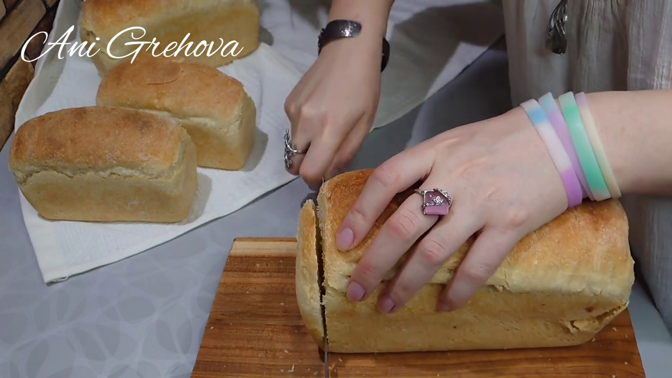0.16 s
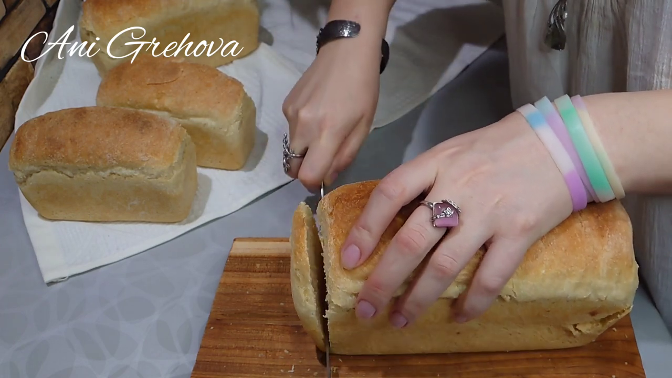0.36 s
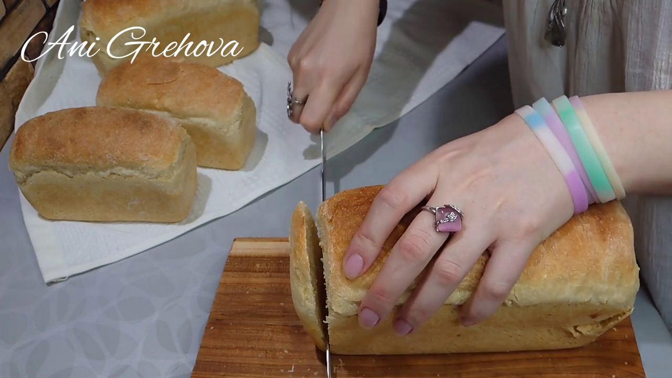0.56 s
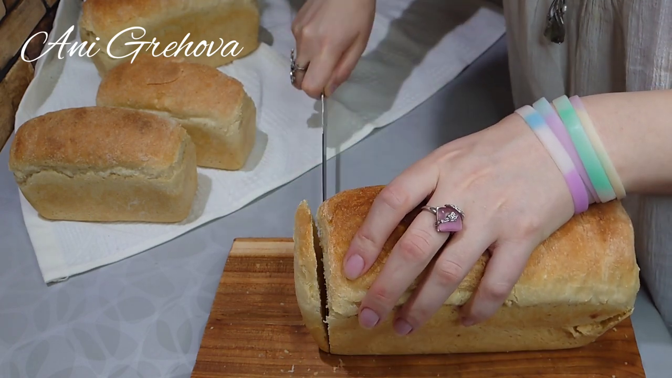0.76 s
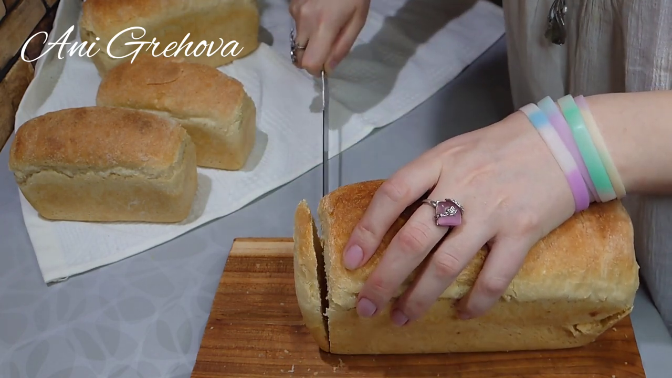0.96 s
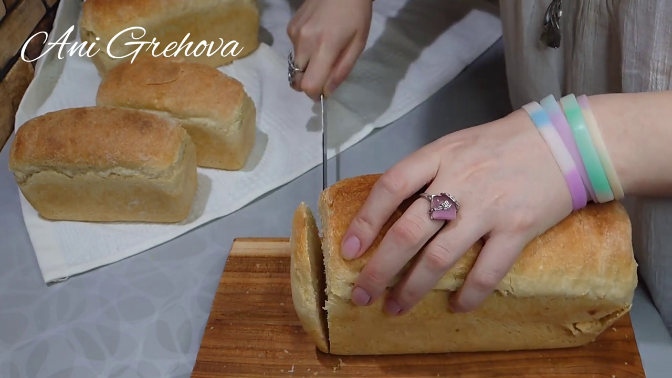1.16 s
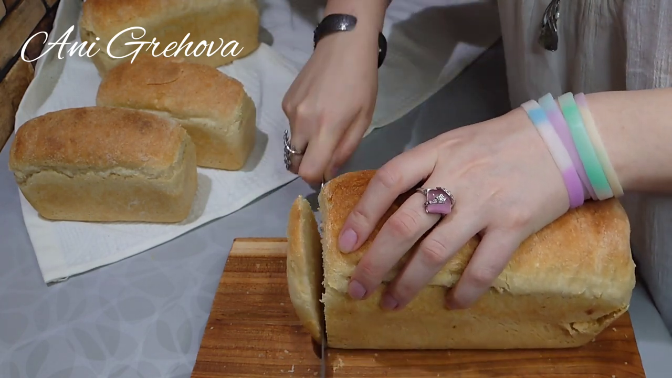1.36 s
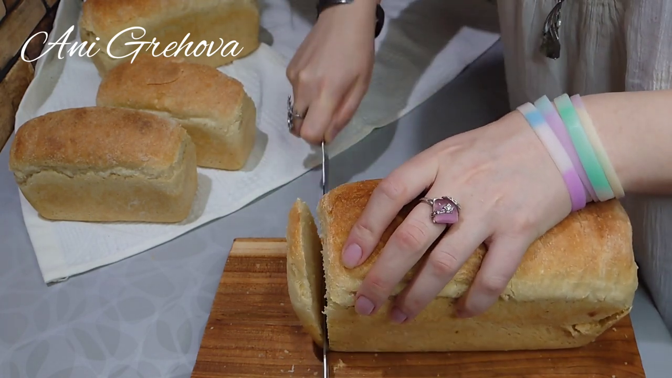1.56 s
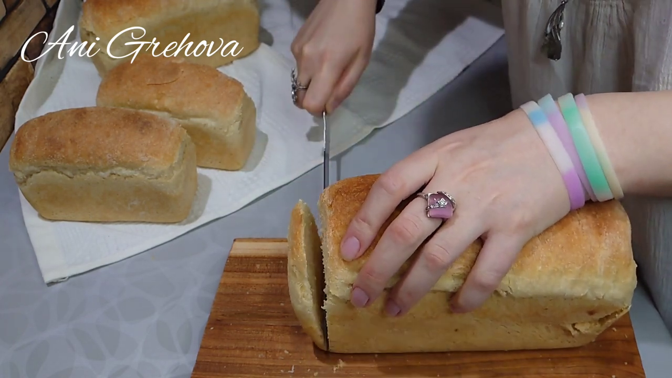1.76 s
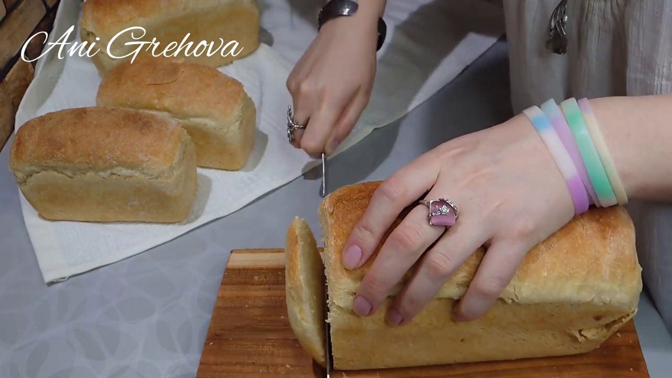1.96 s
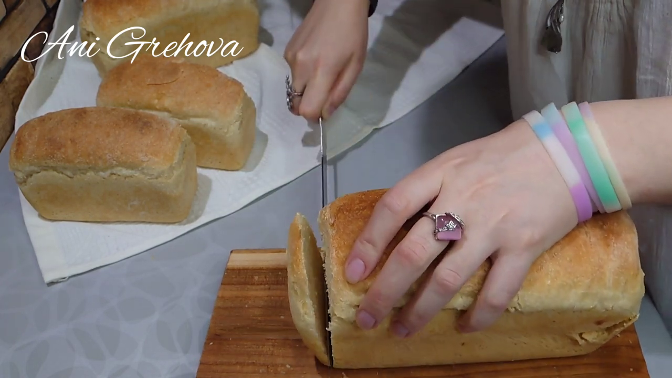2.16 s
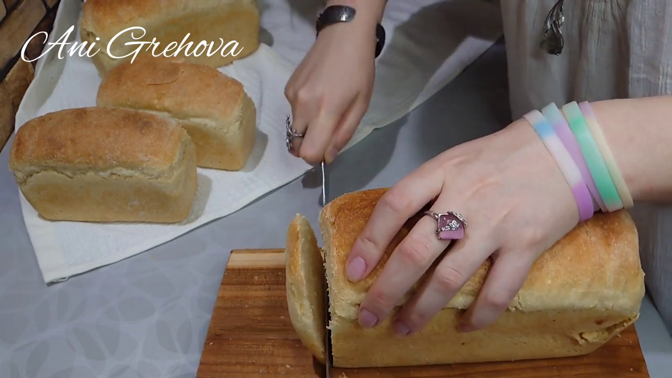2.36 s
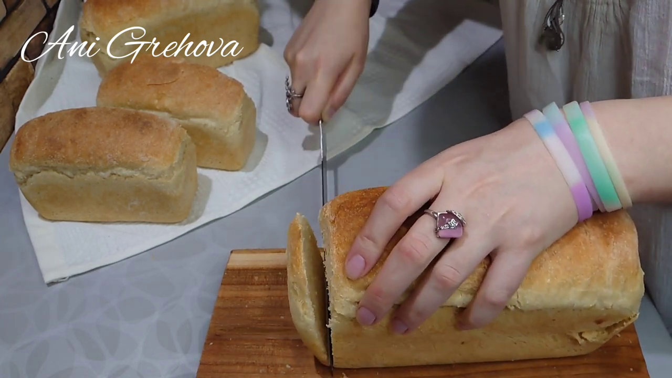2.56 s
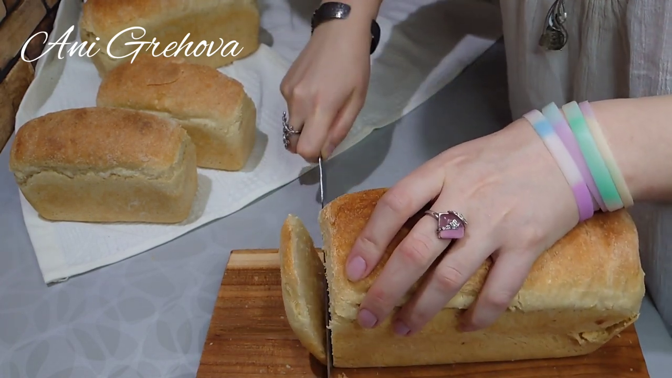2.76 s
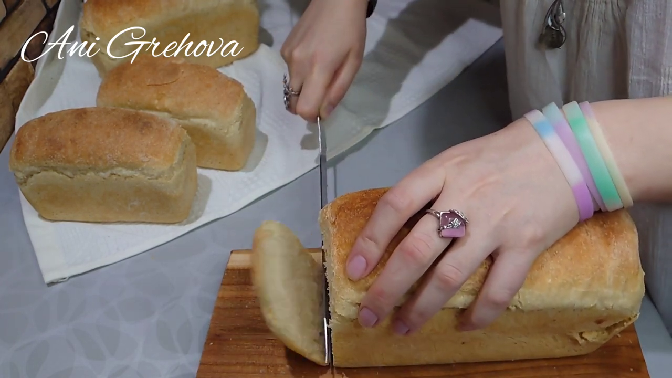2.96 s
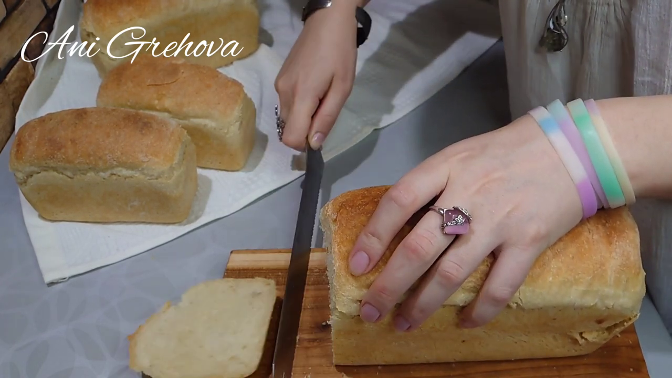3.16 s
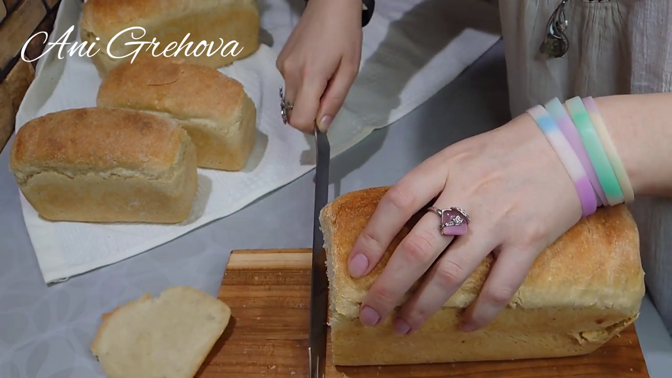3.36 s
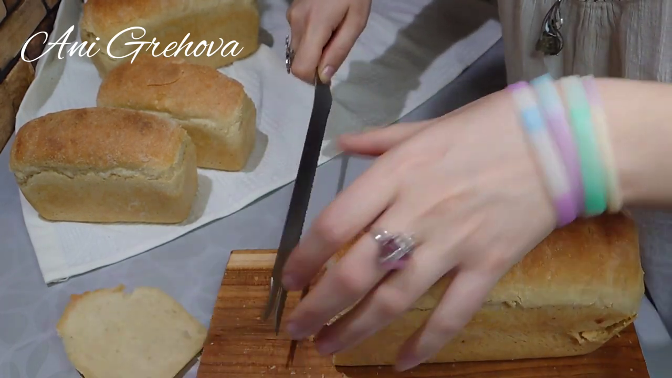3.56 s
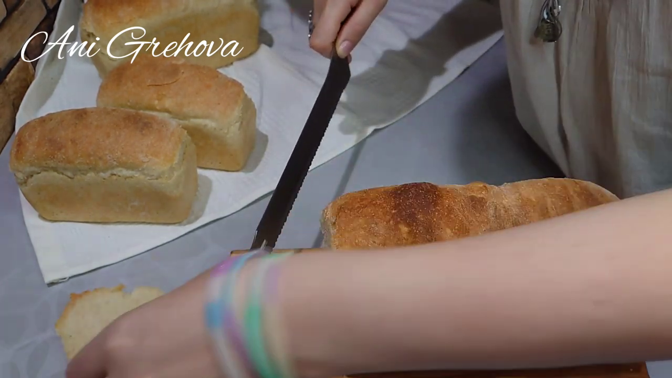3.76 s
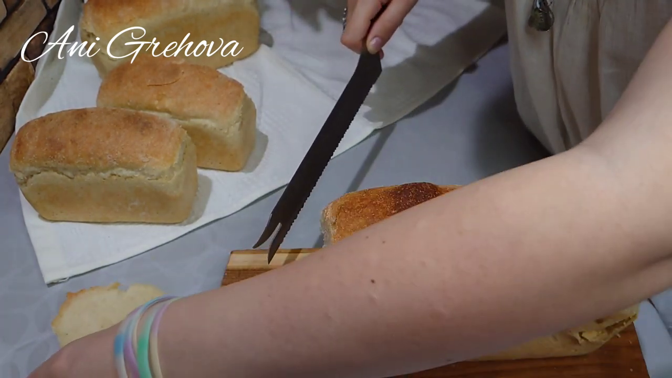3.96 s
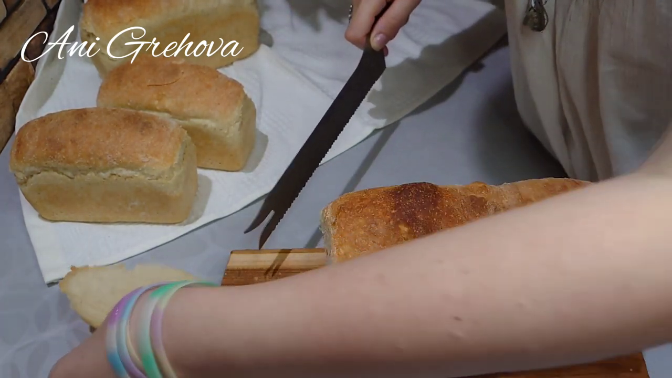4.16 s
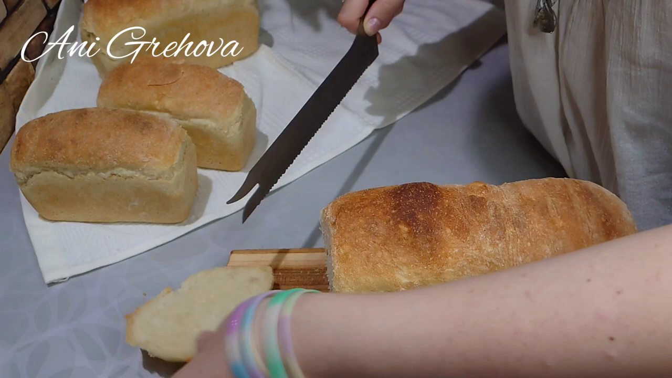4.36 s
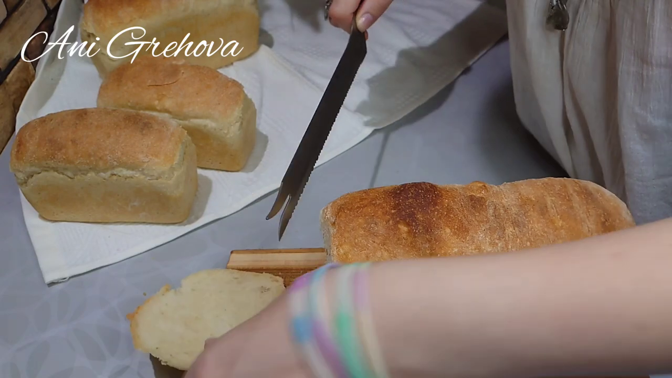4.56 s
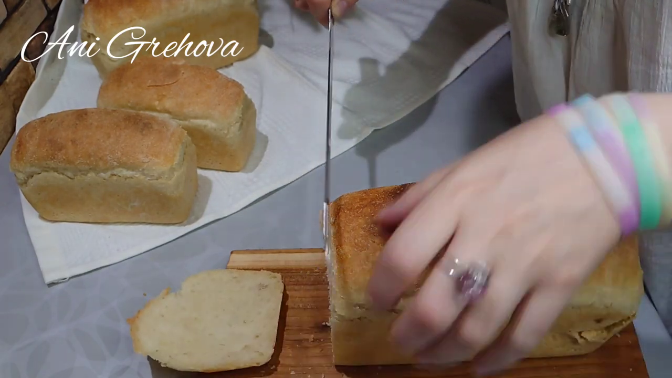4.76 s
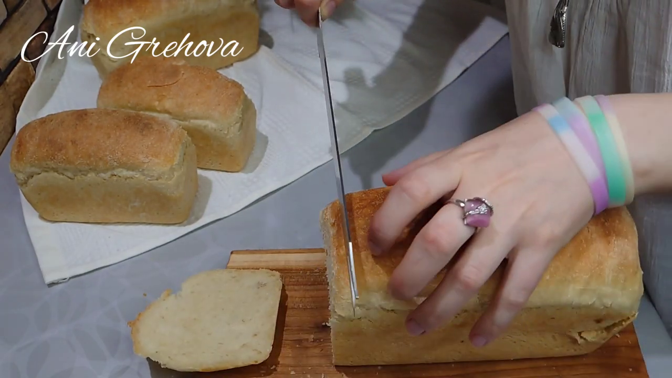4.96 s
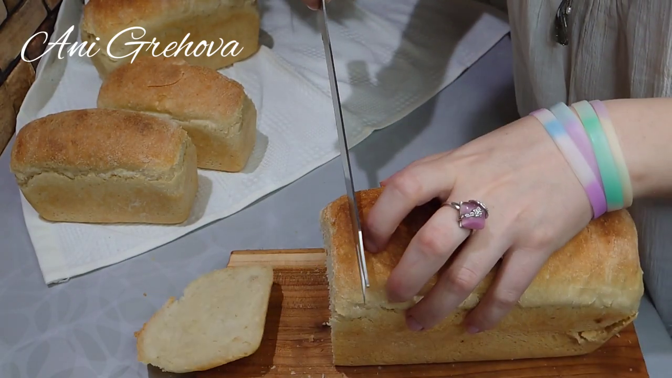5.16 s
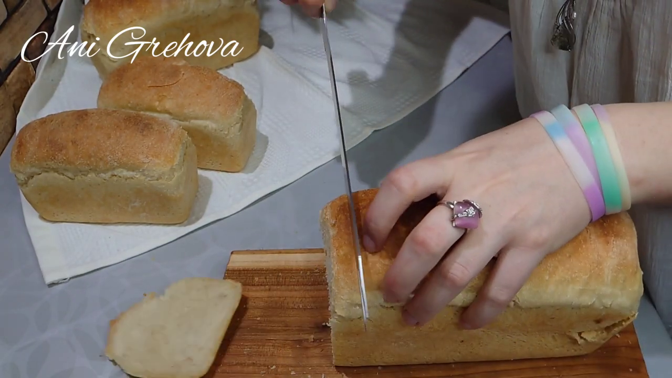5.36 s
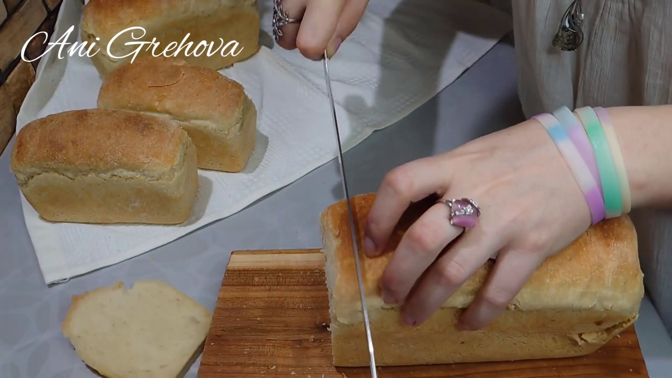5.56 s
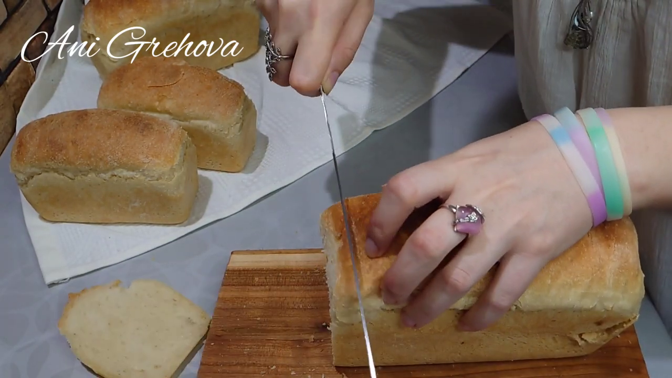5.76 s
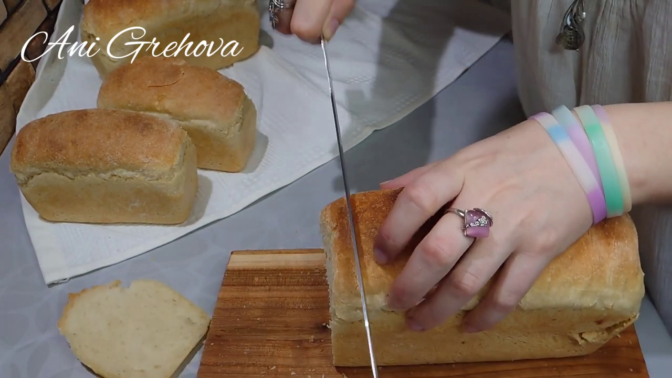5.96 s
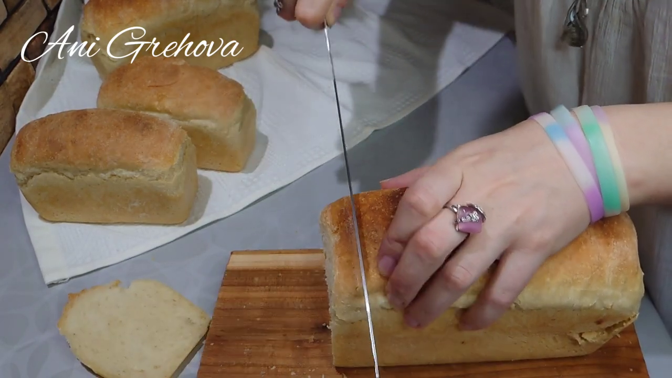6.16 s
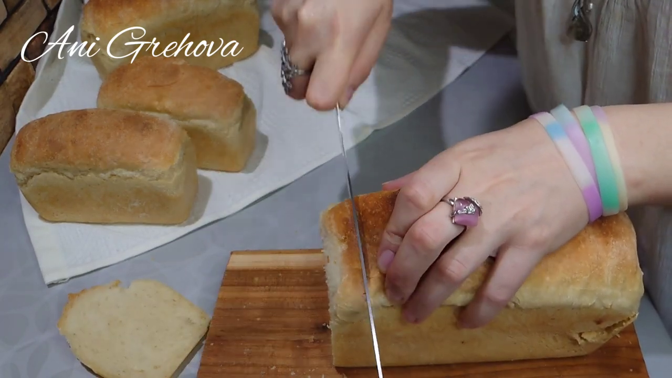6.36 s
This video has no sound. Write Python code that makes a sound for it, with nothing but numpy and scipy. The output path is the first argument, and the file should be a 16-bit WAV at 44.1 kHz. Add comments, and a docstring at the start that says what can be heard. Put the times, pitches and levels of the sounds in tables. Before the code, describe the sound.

Close in a small quiet kitchen, a serrated knife saws a crusty loaf on a wooden board. Slow hollow rasps with dry crackle come first, then a heavy double knock and faster, deeper strokes with blade ring. Another knock and small ticks end the cut; faint brushing follows, then lighter scratchy strokes on the crust. The left microphone on the table is boomy, the right airy and crisp.

```python
"""Sawing a crusty loaf

A serrated knife saws a loaf on a wooden board, taps the board, rests while a hand moves the slice,
then starts on the top crust again. Random tooth catches and single blows drive resonant wood; breaking
crumbs are noise bursts and short tones coloured by the blade, which also rings as its edge slides.
The left microphone lies on the table, heavy with bass; the right hears the crust crackle through the air.
Shaped noise and faint tones make the kitchen, and decaying noise makes its reverberation."""
import sys
import numpy as np
from scipy import signal
from scipy.fft import rfft, irfft, next_fast_len
from scipy.io import wavfile
from scipy.ndimage import map_coordinates

SR = 44100
rng = np.random.default_rng(int(sys.argv[2]) if len(sys.argv) > 2 else 0)


def unload_audio(sound):
    """Save the sound as a 16-bit wav file, at the path given as the first command line argument."""
    columns = np.transpose(np.atleast_2d(sound))
    # keep every value between -1 and 1, then stretch to whole-number steps
    steps = np.round(np.clip(columns, -1, 1) * 32767)
    wavfile.write(sys.argv[1], SR, steps.astype(np.int16))


N = 282681

# Steady kitchen hum and hiss, relative levels: pitch_hz, left_db, right_db
KITCHEN_SPECTRUM = [(24.9, 13, -11.5), (45.2, 16, -6), (102, -10.5, -15.5), (199.4, -21.5, -9),
                    (358.2, -8.5, -21), (780, -14.5, -21), (1015, -1.5, -24.5), (1258, -19.5, -26.5),
                    (1560, -14.5, -29.5), (2920, -24.5, -32.5), (4780, -43.5, -35), (5470, -56, -64.5),
                    (9200, -57, -51.5), (12300, -44, -50.5), (13300, -32, -52), (15240, -28, -50.5)]
# Left-right correlation of the hum: pitch_hz, likeness (0 to 1)
HUM_LIKENESS = [(40, 0.79), (220, 0.97), (350, 0.98), (1000, 0.18), (4000, 0.051)]
# Faint steady tones on the left: pitch_hz, level_db, start_s, end_s
STEADY_TONES = [(872, -65.5, 0, 4.3), (1744, -75, 0, 6.5), (996, -69, 0, 4.3), (781, -68, 3.68, 3.98)]
# Reverberation: pitch_hz, t60_s
WALL_DECAY = [(200, 0.3), (2000, 0.32), (10000, 0.34)]
# Table top mode: pitch_hz, width_hz, left_db, right_db
TABLE_MODES = [(113.9, 35.6, 9, 4)]
# Board rocking on the table, the first mode being its sway: pitch_hz, width_hz, left_db, right_db
ROCKING_MODES = [(53.7, 37, 1.5, -30), (165.9, 44.6, 6, -11.5), (203, 60.4, 5.7, -14)]
# Board bending, the first two modes being the low ones: pitch_hz, width_hz, left_db, right_db
BENDING_MODES = [(250.3, 46.4, -4, -26.5), (322.7, 62, 0, -44.5), (361, 59, -8, -36),
                 (434, 72, -10.5, -25.5), (545.7, 78, -10, -27), (644.3, 59, -16, -29.5),
                 (691, 17, -23.5, -27), (878, 54, -23, -28), (1005, 99, -33, -33.5),
                 (1163, 60, -28.5, -40.5)]
# Damped blade modes: pitch_hz, width_hz, lift_db
BLADE_MODES = [(1108, 24, 4), (2223, 51, -7), (2650, 66, -6), (3115, 100, -3), (4090, 180, -7.5)]
# Crackle colour at each microphone: pitch_hz, left_db, right_db
CRUST_SPECTRUM = [(300.6, -7, -8.5), (700, 0.5, -7), (1017, -6, -21), (1458, -32, -8.5), (2000, -16, -8.5),
                  (2800, -20.5, -9.5), (4180, -31, -12), (4920, -35, -15), (5780, -76, -36.5),
                  (7700, -63.5, -29), (8800, -53.5, -31), (10100, -50, -25), (13170, -28.5, -30.5),
                  (15940, -24, -27.5)]
# Blows on the board, relative levels: start_s, level_db, high_modes_over_it_db, rocking_over_it_db
KNOCK_EVENTS = [(0.471, -44, 8, 1), (0.488, -32.5, 0, 2), (1.199, -42, -5, -17), (1.22, -40, 6, -14),
                (1.33, -21, -4, -3), (1.354, -11.5, -7.5, -19), (1.367, -27, 1, -19), (1.414, -7, 2, -11),
                (1.422, -4.5, 3.5, -35), (1.432, -3.5, -5, -19), (1.45, -24, -3, -22),
                (1.953, -24, -4, -23), (1.979, -30.5, 11.5, -16), (2.033, -16, -5, -6.5),
                (2.072, -15, -5.5, -20), (2.323, -21.5, -10, -12), (2.516, -32, 2, -3), (2.681, -27, 2, -8),
                (2.706, -21.5, 6, -10), (2.732, -17, 6, -31), (2.898, -29, 7, -20), (3.07, -28, -9, -11),
                (3.104, -37, 1, -18), (3.187, -6.5, 2.5, -15), (3.321, -26.5, 10, -21),
                (3.338, -19, 3, -19), (3.457, -32, 3.5, -27), (3.567, -38.5, 6, -27),
                (3.627, -28.5, 5.5, -18), (3.943, -34, 2, -17), (3.997, -45, -2, -17), (4.446, -38, 3, -9),
                (4.574, -52, 12, -17), (4.625, -54, 17.5, -25), (5.354, -45, 11, -23), (5.384, -38, 7, -8),
                (5.427, -38, 8, -16), (5.679, -30.5, 8.5, -30)]
# Crust cracks and blade ticks, relative levels: start_s, level_db, treble_over_it_db, t60_ms
CRACK_EVENTS = [(0.0524, -40.5, -21, 33), (0.0765, -37.5, -14.5, 60), (0.102, -39, -19, 29),
                (0.122, -33, -18, 20), (0.158, -44, -17, 29), (0.191, -58, -21, 28), (0.2478, -39, -19, 17),
                (0.284, -57, -8, 14), (0.403, -60.5, -3, 10), (0.435, -58, -5, 12),
                (0.4773, -45.5, -12, 12), (0.559, -31.5, -13.5, 69), (0.568, -37, -25, 9.8),
                (0.5943, -41.5, -2.5, 26), (1.409, -29.5, -32.5, 29), (1.432, -35.5, -24, 14),
                (1.45, -23, -25, 5.4), (1.539, -47, -10, 15), (1.668, -47, -4, 15.7), (1.72, -56, -10, 12),
                (2.0055, -48, -23, 13), (2.172, -42.5, -21, 14), (2.206, -46, -24, 16),
                (2.324, -49, -21, 20), (2.65, -43.5, -10.5, 17), (2.716, -46, -26, 14),
                (3.1881, -26.5, -23, 22), (3.26, -44.5, -21.5, 18), (3.323, -49, -5.5, 28),
                (3.339, -38.5, -22, 3), (3.456, -56.5, -0.5, 17), (3.587, -49, -28, 20),
                (3.6318, -35, -36.5, 9.6), (3.8505, -48, -26, 12), (4.449, -51.5, -25, 17),
                (4.574, -50, -24, 15), (5.35, -48.5, -6, 12), (5.3808, -59, -18, 11),
                (5.4878, -51, -2.5, 13), (5.677, -43, -12.5, 12), (5.7154, -37, -16, 47),
                (6.2342, -49, -23, 14)]
# Fingers brushing the slice, relative levels: start_s, level_db, treble_over_it_db, length_ms
BRUSH_EVENTS = [(4.1806, -61, -18.5, 11), (4.2194, -69, -17, 32), (4.57, -62, -23, 66),
                (4.8973, -60, -18.5, 28), (5.1874, -78, -15, 17)]
# Blade edge sliding with no crumb to damp it:
# full_from_s, rise_s, hold_s, fall_s, half_growth_db, low_ring_db, high_ring_db
SLIDE_EVENTS = [(3.265, .02, 0.026, .02, -4.5, -68, -74), (3.325, 0.02, .015, .06, 2, -49, -79),
                (3.45, .06, .15, .03, 4, -67, -86.5), (5.37, .03, 0.22, .03, -4, -62, -78)]
# How much a stroke rings the blade, by depth of the cut: time_s, low_ring_db, high_ring_db, middle_ring_db
STROKE_RING = [(0, -15, -14, -22), (1.2, -3, -14, -26), (2, -1.5, -11, -20), (3.15, -1, -13, -20.5),
               (5.3, -11, -36, -16), (6.41, -6, -32, -9)]
# Rubs on the bread, saw strokes and the hand moving the slice:
# full_from_s, rise_s, hold_s, fall_s, half_growth_db, low_bend_db, high_bend_db, rocking_db, sway_db,
# table_top_db, crust_db, dryness_db (treble over the crust level)
STROKE_EVENTS = [(-0.03, .03, 0.027, 0.048, 2, -37.5, -41, -43.5, -30.5, -54, -52.5, -12),
                 (0.078, 0.036, 0.21, 0.11, 2.5, -34, -38.5, -49, -40, -58, -55, -7.5),
                 (0.491, 0.067, 0.23, 0.26, -2, -35.5, -36, -37.5, -36.5, -49.5, -55.5, -9.5),
                 (0.827, .06, 0.22, 0.12, -3, -47.5, -49.5, -59.5, -64, -73, -71.5, -35),
                 (1.188, 0.047, 0.13, 0.026, 2, -38, -40, -44.5, -43, -56, -67, -13.5),
                 (1.352, 0.073, 0.046, .04, 2, -29.5, -34.5, -41, -55, -46, -55.5, -12),
                 (1.414, .02, 0.023, 0.069, 2.5, -23.5, -18, -29.5, -34, -61, -47.5, -12.5),
                 (1.588, 0.23, 0.18, 0.073, 0, -34.5, -37.5, -42, -41.5, -45.5, -59, -9.5),
                 (1.982, 0.19, 0.071, 0.046, 1, -34.5, -34.5, -44.5, -39.5, -52.5, -59.5, -13),
                 (2.164, 0.077, 0.078, 0.041, 0.5, -37.5, -37.5, -41, -47, -41.5, -59, -14),
                 (2.329, 0.057, 0.092, 0.042, 2.5, -26.5, -30.5, -41, -42, -48.5, -59, -12.5),
                 (2.506, 0.13, 0.09, .06, 2, -38, -37, -41.5, -43, -51, -59.5, -11.5),
                 (2.716, 0.092, 0.087, 0.035, -1.5, -27.5, -30.5, -44.5, -36, -48.5, -56, -13.5),
                 (2.885, 0.085, 0.11, 0.03, -0.5, -39.5, -37.5, -41, -48, -44, -58.5, -13),
                 (3.086, 0.085, 0.038, 0.065, 2, -42.5, -39, -56, -51, -52, -61, -12),
                 (3.194, 0.035, 0.1, 0.065, -0.5, -44, -42, -54.5, -46, -56, -70, -11),
                 (3.318, 0.017, 0.043, 0.096, -2, -35, -31, -49, -59, -60, -58.5, -15),
                 (3.419, 0.069, 0.073, 0.29, 1, -54.5, -48, -59.5, -67, -63, -68, -16),
                 (3.641, 0.026, 0.0086, 0.093, -4.5, -53.5, -45, -56.5, -62, -77, -70, -20),
                 (3.94, 0.035, 0.017, 0.21, 0.5, -59, -55, -64, -65, -60, -79.5, -23),
                 (4.204, 0.12, .04, 0.22, 0, -75, -65, -81, -80, -74, -72.5, -13),
                 (4.466, 0.02, 0.22, .05, -4.5, -71, -59.5, -73, -67, -71.5, -81, -20),
                 (4.993, 0.19, 0.072, 0.53, -2, -72, -68, -68, -75, -71.5, -86, -9.5),
                 (5.403, 0.12, 0.16, 0.11, 0, -55.5, -45, -57, -52.5, -67.5, -65.5, -24),
                 (5.555, 0.24, 0.11, 0.067, 2, -57, -49.5, -58, -49, -64, -54, -12),
                 (5.711, 0.026, 0.066, 0.071, 0, -62, -66, -54.5, -48, -61, -50, -9),
                 (5.967, 0.099, 0.15, 0.058, 0.5, -75, -62, -57.5, -52, -62, -55.5, -11.5),
                 (6.27, 0.059, 0.18, .05, 1, -64, -59, -58, -44.5, -61, -49, -12.5)]
# Drop from the middle of a hold to its ends, in the order of the stroke levels: drop_db
HOLD_ROUNDING = [3.7, 2.5, 3.2, 2, 2.6, 2.67, 3.7]

TREBLE_HZ, TOP_HZ = 5800, 15850  # crossover from crust body to hiss, and upper band limit
SWING_DB = 20  # level gained over a rise and lost over a fall
THUD_DB, THUD_GROWS = 13.5, 0.66  # the table's thud follows the blow only in part
BEND_DB, ROCK_DB, SWAY_DB = 41.5, 39, 36.5  # how well a blow couples into each motion
TABLE_LAG_S = 0.02  # the heavy table top answers a stroke late


def amp(db):
    """Decibels to gain."""
    return 10 ** (np.asarray(db) / 20)


def unit(x):
    """Scale to rms 1."""
    return x / np.sqrt(np.mean(x ** 2) + 1e-20)


def along(points, hz):
    """Read every column after the first on a log frequency axis."""
    f, *columns = np.transpose(points)
    return np.array([np.interp(np.log(hz + 1), np.log(f + 1), c) for c in columns])


def wobble(rate):
    """A smooth random curve with rate knots a second."""
    knots = rng.standard_normal(int(N * rate / SR) + 4)
    return map_coordinates(knots, [np.arange(N) * rate / SR])


def filtered(x, response):
    """Multiply the spectrum of x by a complex response of frequency."""
    m = 2 * next_fast_len(N // 2 + SR // 4)  # room for the ringing
    return irfft(rfft(x, m) * response(np.fft.rfftfreq(m, 1 / SR)), m)[..., :N]


def causal(gain):
    """The minimum-phase response with this gain, so no sound precedes its cause."""
    cepstrum = irfft(np.log(np.maximum(gain, 1e-6)))
    half = cepstrum.shape[-1] // 2
    cepstrum[..., 1:half] *= 2
    cepstrum[..., half + 1:] = 0
    return np.exp(rfft(cepstrum))


def mode(f, hz, width):
    """One resonance, gain 1 at its centre."""
    return 1j * f * width / (hz * hz - f * f + 1j * f * width)


def slips(rate, spread_db, smooth):
    """Random catches of the teeth, rate a second and of scattered size, on an even rub."""
    hit = rng.random(N) < rate / SR
    sizes = amp(spread_db * np.clip(rng.standard_normal(N), -2, 2))
    sizes = sizes * np.sign(rng.standard_normal(N))
    return unit(unit(hit * sizes) + smooth * rng.standard_normal(N))


def swells(rows, round_db):
    """Gain curves that rise, hold with a rounded top and fall; one for each level column."""
    t, power = np.arange(N) / SR, 0
    for s, rise, hold, fall, half_growth_db, *levels in rows:
        outside = np.maximum((s - t) / rise, (t - s - hold) / fall)
        slope_db = SWING_DB * np.maximum(outside, 0)
        place = np.clip(2 * (t - s) / hold - 1, -1, 1)  # -1 to 1 across the hold
        shape_db = half_growth_db * place - slope_db
        rounding_db = np.array(round_db)[:, None] * place ** 2
        power = power + amp(np.array(levels)[:, None] + shape_db - rounding_db) ** 2
    return np.sqrt(power)


def tones():
    """Faint sine tones, each wavering a little and fading at its ends."""
    t, total = np.arange(N) / SR, 0
    for hz, db, start, end in STEADY_TONES:
        fade_db = 60 * np.maximum(np.maximum(start - t, t - end), 0) / .4
        total = total + amp(db + 1.5 * wobble(4) - fade_db) * np.sin(2 * np.pi * hz * t)
    return total


def kitchen():
    """Steady background of shaped noise and tones, near mono in the bass, slightly unsteady."""
    def mid_side(f):
        turn = np.arccos(np.clip(along(HUM_LIKENESS, f)[0], 0, 1)) / 2
        return [np.cos(turn), np.sin(turn)]

    def colour(f):
        return amp(along(KITCHEN_SPECTRUM, f)) * f ** 2 / (f ** 2 + 30 ** 2)

    mid, side = filtered(rng.standard_normal((2, N)), mid_side)
    hum = filtered(np.array([mid + side, mid - side]), colour)
    hum = amp(-55.5 + 0.22 * wobble(4.6)) * hum / np.std(hum[0])
    hum[0] += tones()
    return hum


def walls(x):
    """The kitchen's answer: decaying noise in which each frequency dies at its own speed."""
    hz, t, z = signal.stft(rng.standard_normal((2, SR // 2)), SR, nperseg=256)
    decay = amp(-60 * t / along(WALL_DECAY, hz)[0][:, None])
    tail = signal.istft(z * decay, SR, nperseg=256)[1]
    late = np.pad(x, ((0, 0), (300, 0)))  # delay in samples before the answer
    return signal.fftconvolve(late, tail / np.linalg.norm(tail[0]), axes=1)[:, :N]


def drag(stroke):
    """The sliding edge chatters and rings three blade modes, also under each stroke."""
    t = np.arange(N) / SR
    time_s, *ring_db = np.transpose(STROKE_RING)
    sliding = [*swells(SLIDE_EVENTS, [1, 1]), np.zeros(N)]
    sawing = [stroke * amp(np.interp(t, time_s, db)) for db in ring_db]
    gains = np.hypot(sliding, sawing)
    sides_db = ([[-3], [1]], [[-16], [8]], [[-8], [6]])  # left, right
    modes = ((BLADE_MODES[0][0], 200), (BLADE_MODES[-1][0], 350), (BLADE_MODES[2][0], 200))  # pitch, width in Hz
    total = 0
    for gain, side_db, (hz, width) in zip(gains, sides_db, modes):
        chatter = slips(rate=120, spread_db=4, smooth=.4)
        ring = unit(filtered(chatter, lambda f: mode(f, hz, width) ** 2))
        total = total + gain * ring * amp(side_db)
    return total * [[-1], [1]]  # opposite polarity at the two microphones


def crumbs(rate, cycles):
    """Each breaking crumb is a short damped tone of its own pitch and size."""
    s, pitch, size = rng.random((round(rate * N / SR), 3)).T
    hz, t = 900 * 6 ** pitch[:, None], np.arange(256) / SR
    decay = amp(-24 * size[:, None] - 20 * t * hz / cycles)  # 20 dB lost in this many cycles
    fade = np.cos(np.pi / 2 * t / t[-1])
    grains = decay * fade * np.sin(2 * np.pi * hz * t) * np.sqrt(hz)
    at = (s[:, None] * N).astype(int) + np.arange(256)
    return unit(np.bincount(at.ravel(), grains.ravel())[:N])


def crust(stroke, treble):
    """Crumbs break in short bursts that ring the blade; dry crust adds a treble hiss."""
    t = np.arange(SR // 8) / SR
    catches = np.abs(slips(rate=250, spread_db=4, smooth=0))
    clumps = unit(np.abs(signal.fftconvolve(catches, amp(-60 * t / .007))[:N]))
    rough, rougher = unit(clumps + 2.2), unit(clumps + 1.1)  # bursts over an even rub
    sway = amp(0.79 * wobble(20))
    stroke = stroke * sway
    low = amp(-0.5) * stroke * rough
    high = amp(13) * treble * sway * rougher

    def add_burst(s, db, treble_db, shape):
        at = round(s * SR)
        low[at:][:len(t)] += amp(db - 9.5) * shape
        high[at:][:len(t)] += amp(db + treble_db + 6.5) * shape

    edges, taps = np.zeros(N), np.zeros(N)
    for s, db, treble_db, ms in CRACK_EVENTS:
        add_burst(s, db, treble_db, amp(-60 * t / (ms / 1000)) * (1 - np.exp(-t / .0008)))
        edges[round(s * SR)] = amp(db + 7.0)  # the sharp first edge of a crack
        taps[round(s * SR)] = amp(db + 27)
    for s, db, treble_db, ms in BRUSH_EVENTS:
        add_burst(s, db, treble_db, np.sin(np.pi * np.minimum(t * 1000 / ms, 1) ** .6))

    def ring(f):
        blade = 1 + sum(amp(db) * mode(f, hz, width) for hz, width, db in BLADE_MODES)
        return amp(along(CRUST_SPECTRUM, f)) * np.abs(blade)

    def below(f):
        return causal(ring(f) / (1 + (f / TREBLE_HZ) ** 20))

    def above(f):
        return causal(ring(f) / (1 + (TREBLE_HZ / (f + 1)) ** 20))

    def lowest_blade_mode(f):
        return amp([[-2], [5]]) * mode(f, BLADE_MODES[0][0], 220) ** 2

    shared, own = rng.standard_normal((2, N)), rng.standard_normal((2, 2, N))  # noise common to or split by side
    grains = amp(-6) * stroke * crumbs(rate=1100, cycles=8)
    body = filtered(grains + edges + low * (0.6 * shared[0] + 1.75 * own[0]), below)
    hiss = filtered(high * (shared[1] + 1.35 * own[1]), above)
    crackle = amp(14) * body + amp(15.5) * hiss + filtered(taps, lowest_blade_mode)
    crackle[0] = np.roll(crackle[0], shift=20)  # the left microphone is a hand's width further away
    return crackle


def rubbing():
    """Force bending, rocking and thudding the wood, then body and treble of the crust."""
    rows = [(*row[:-1], row[-2] + row[-1]) for row in STROKE_EVENTS]  # dryness becomes treble level
    rub = swells(rows, HOLD_ROUNDING)
    t = np.arange(N) / SR
    rub[4] = np.interp(t - TABLE_LAG_S, t, rub[4])
    return rub


def wood(modes, damping):
    """Response at both microphones; each mode acts twice, so the valleys stay deep."""
    def response(f):
        total = 0
        for k, (hz, width, left, right) in enumerate(modes):
            sign = (-1) ** k
            total = total + sign * amp([[left], [right]]) * mode(f, hz, width * damping) ** 2
        return total
    return response


def board(forces):
    """Sawing shakes the wood; blows are single pushes into the same modes."""
    def soft(f):
        return 1 / (1 + 1j * f / 700) ** 2  # a soft contact puts little into the high modes

    at, level_db, high_db, rock_db = np.transpose(KNOCK_EVENTS)
    bend_db = level_db + BEND_DB
    blow_db = [bend_db, bend_db + high_db, level_db + ROCK_DB + rock_db,
               level_db + SWAY_DB + rock_db, THUD_DB + THUD_GROWS * level_db]
    groups = BENDING_MODES[:2], BENDING_MODES[2:], ROCKING_MODES[1:], ROCKING_MODES[:1], TABLE_MODES
    far_shares = (.6, 0.39, 0.16, .2, .15)  # the right side also hears other spots of the wood
    sound = 0
    for push, hit_db, modes, share in zip(forces, blow_db, groups, far_shares):
        near, far = (slips(rate=400, spread_db=3, smooth=.8) for spot in range(2))
        spots = np.array([near, np.sqrt(1 - share) * near + np.sqrt(share) * far])
        force = push * amp(24.0 + 0.51 * wobble(25.345)) * spots
        hits = np.bincount(np.round(at * SR).astype(int), amp(hit_db), N)
        sound = sound + filtered(force, wood(modes, damping=1))
        sound = sound + filtered(filtered(hits, soft), wood(modes, damping=0.9))  # blows ring a little longer
    return sound


def scene():
    """Wood and air paths, each with the kitchen's answer, over the background."""
    rub = rubbing()
    knocks = board(rub[:5])
    air = crust(*rub[5:]) + drag(rub[5])
    return knocks + amp(-18) * walls(knocks) + air + amp(-9) * walls(air) + kitchen()


def record(dry):
    """The microphones lose the deepest bass; nothing is kept above the band limit."""
    bass_cut = filtered(dry, lambda hz: (1j * hz / (30 + 1j * hz)) ** 4)
    return filtered(bass_cut, lambda hz: hz < TOP_HZ)


dry = scene()
out = record(dry)
unload_audio(out)
```